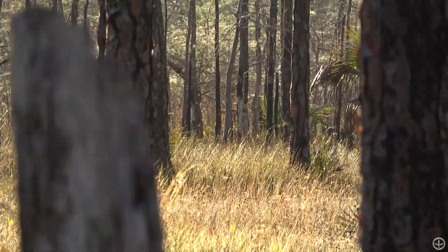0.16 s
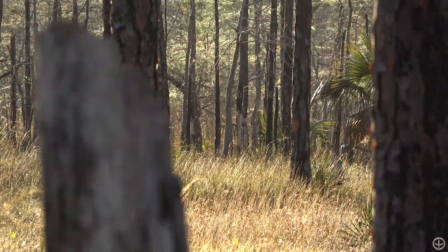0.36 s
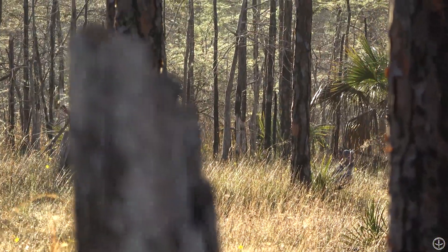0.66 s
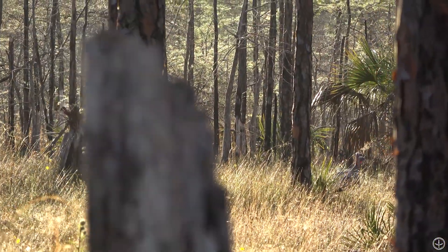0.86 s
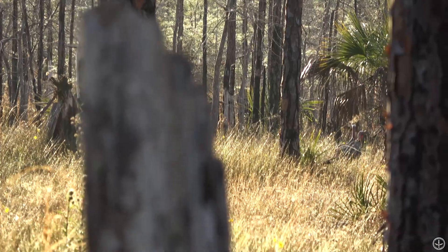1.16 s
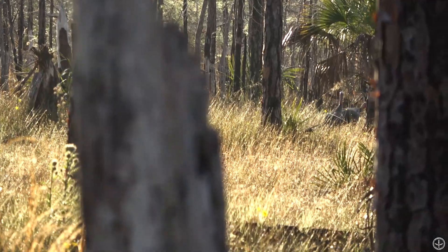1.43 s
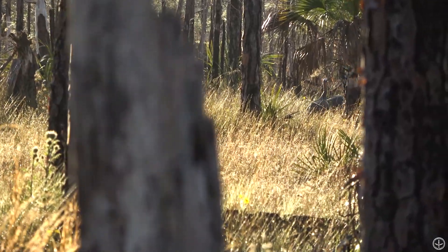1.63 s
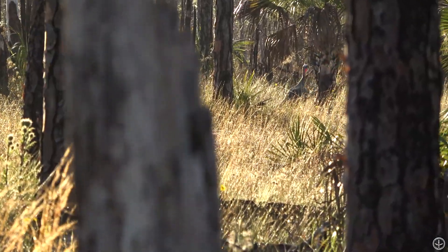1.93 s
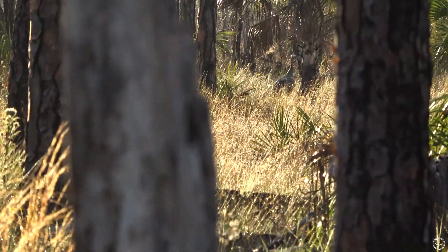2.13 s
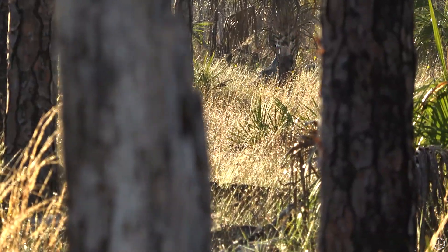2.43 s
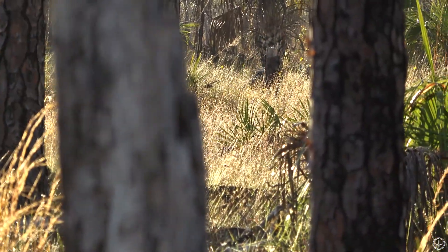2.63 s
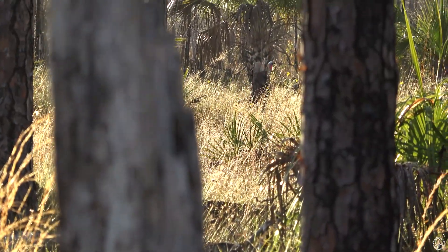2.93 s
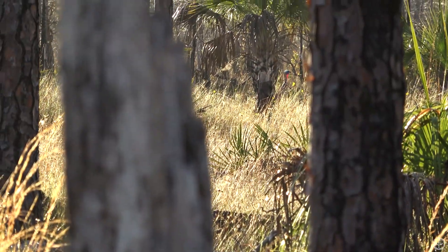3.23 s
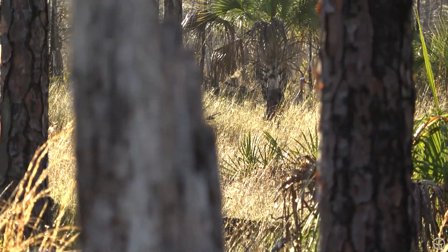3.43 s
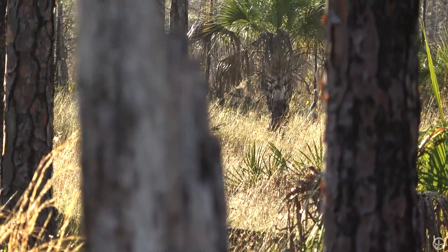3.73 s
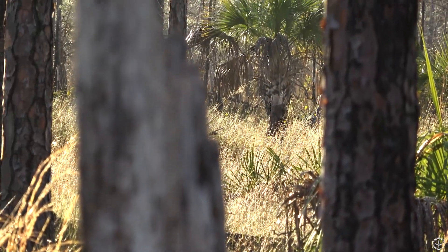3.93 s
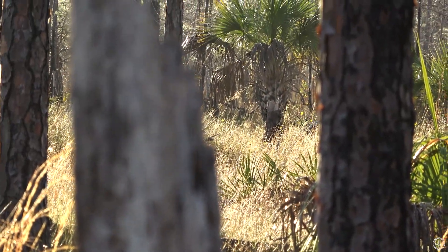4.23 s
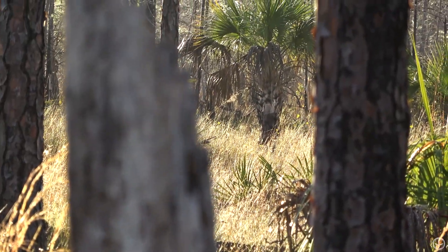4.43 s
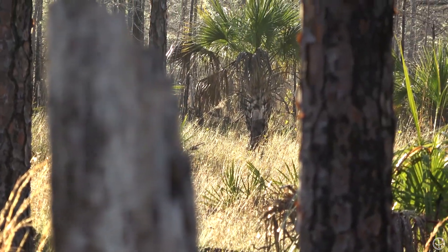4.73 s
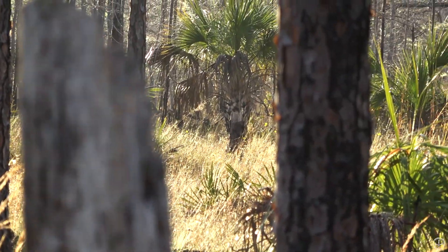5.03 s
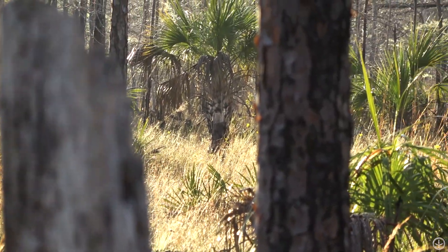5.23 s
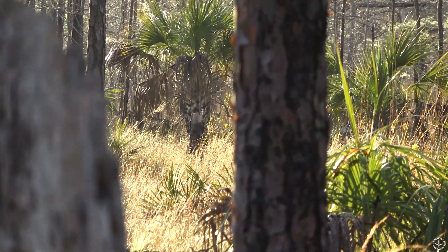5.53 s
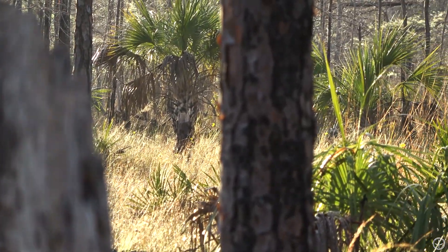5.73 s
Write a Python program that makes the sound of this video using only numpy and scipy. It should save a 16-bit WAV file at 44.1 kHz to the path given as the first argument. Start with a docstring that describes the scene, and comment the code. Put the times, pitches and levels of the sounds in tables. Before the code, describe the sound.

Quiet open pine woodland with soft air and faint high insects. The microphone's mount sways with deep rumble, drone and muffled thuds; a few dry twig ticks sound close by. A faint buzzy trill comes early, then four short arched whistles, growing louder. Just before three seconds a woodpecker drums a fast, hollow roll for under a second, echoing off the trunks. Faint falling bird notes follow, then hoarse distant calls at the end.

```python
"""Open pine woodland. A bird gives one fast, hollow rattle, most likely a woodpecker drumming on a dead trunk:
each blow rings decaying modes. A songbird whistles four arched notes, nearly pure swept tones.
Fainter birds slur, chip, trill and call hoarsely as gliding tones, noise bursts and a filtered harmonic stack.
Insects and air are shaped noise, twigs tick as resonant bursts, and the moving mount rumbles, drones and thuds.
The trunks scatter the drumming and most of the bird voices back as a decaying train of random echoes."""
import sys
import numpy as np
from scipy import signal
from scipy.fft import rfft, irfft, next_fast_len
from scipy.io import wavfile
from scipy.ndimage import uniform_filter1d

SR = 44100
rng = np.random.default_rng(int(sys.argv[2]) if len(sys.argv) > 2 else 0)


def generate_wav(sig):
    """Save sig (samples, or channels by samples) to the path in sys.argv[1] as 16-bit PCM at SR."""
    pcm = np.round(np.clip(np.atleast_2d(sig).T, -1, 1) * 32767).astype(np.int16)
    wavfile.write(sys.argv[1], SR, pcm)


N = 258867
TIME = np.arange(N) / SR  # seconds


def undb(db):
    """Logarithmic level: decibels to amplitude gain."""
    return 10 ** (np.asarray(db) / 20)


def unit(x):
    """Normalisation: scale to rms 1."""
    return x / np.sqrt(np.mean(x ** 2))


def add(track, start_s, sound):
    """Superposition: mix a sound into a track, cut off at the track's end."""
    i = max(int(start_s * SR), 0)
    track[i:i + len(sound)] += sound[:max(N - i, 0)]


def resonate(x, hz, width_hz):
    """Simple resonance: a two-pole peak with gain 1 at its centre."""
    centre_hz = min(hz, .45 * SR)
    return signal.lfilter(*signal.iirpeak(centre_hz, hz / width_hz, fs=SR), x)


def band(hz, width_hz):
    """Cascaded resonance: noise through two equal peaks has steep sides; rms 1."""
    noise = rng.standard_normal(N + SR)
    once = resonate(noise, hz, width_hz)
    return unit(resonate(once, hz, width_hz)[SR:])  # drop the first second, while the filters settle


def coloured(points):
    """Spectral shaping: noise weighted by (Hz, dB) points joined on a log-frequency axis; rms 1."""
    hz, db = np.transpose(points)
    size = next_fast_len(N)
    f = np.maximum(np.fft.rfftfreq(size, 1 / SR), 1)
    gain = undb(np.interp(np.log(f), np.log(hz), db))
    spectrum = rfft(rng.standard_normal(size)) * gain
    return unit(irfft(spectrum, size)[:N])


def walk(rate):
    """Random modulation: steps drawn at this rate (Hz), smoothed twice; rms 1."""
    k = int(SR / rate)
    steps = np.repeat(rng.standard_normal(N // k + 1), k)
    smooth = uniform_filter1d(uniform_filter1d(steps, k), k)
    return unit(smooth[:N])


def even(x, span_s):
    """Envelope levelling: divide a vibration by its running rms over span_s."""
    return x / np.sqrt(uniform_filter1d(x ** 2, int(span_s * SR)) + 1e-9)


def glide(length_s, start_hz, middle_hz, end_hz):
    """Frequency modulation: one soft-edged sine whose pitch follows a parabola through three points."""
    u = np.linspace(0, 1, int(length_s * SR))
    hz = np.polyval(np.polyfit([0, .5, 1], [start_hz, middle_hz, end_hz], 2), u)
    swell = np.abs(np.sin(np.pi * u)) ** 0.18
    return np.sin(2 * np.pi * np.cumsum(hz) / SR) * swell


def woods(x, t60_s=1.37, build_s=0.008, lumpiness=0.44, treble_hz=4000):
    """Multiple scattering: echoes of uneven strength from many trunks build up, die away and lose treble."""
    t = TIME[:SR * 3 // 2]
    echoes = rng.standard_normal(len(t)) * np.exp(lumpiness * rng.standard_normal(len(t)))
    echoes *= undb(-60 * t / t60_s) * (1 - np.exp(-t / build_s))
    echoes /= np.sqrt(np.sum(echoes ** 2))
    dulled = signal.lfilter(*signal.butter(1, min(treble_hz, .45 * SR), fs=SR), echoes)
    return signal.fftconvolve(x, dulled)[:N]


# spectrum of the calm air in the pines: frequency_hz, relative_level_db (per Hz)
AIR_SPECTRUM = [(60, 3.5), (130, 2), (190, -2.5), (300, 0), (530, -3), (690, 1), (850, -2), (1300, -5),
                (1800, -11.5), (2700, -11.5), (3700, -18), (5800, -21), (7500, -24), (11000, -24.5),
                (15500, -29.5)]
AIR_DB, AIR_SWELL_DB = -64, .2  # mean level and spread
# faint, steady hum in the distance: centre_hz, resonance_width_hz, level_db
HUM_BANDS = [(284.3, 8.7, -83), (340.3, 9.5, -83.5), (636.4, 43, -75.5)]
# insect chorus: centre_hz, resonance_width_hz, mean_level_db
INSECT_BANDS = [(4596, 670, -82), (4670, 140, -84), (5050, 220, -86), (5530, 78, -87), (5945, 510, -86)]


def ambience(flicker_db=0.66):
    """Stationary noise: air that barely swells, a faint hum and insect bands with a slight shimmer."""
    out = coloured(AIR_SPECTRUM) * undb(AIR_DB + AIR_SWELL_DB * walk(3.27))
    for hz, width_hz, db in HUM_BANDS:
        out += band(hz, width_hz) * undb(db)
    for hz, width_hz, db in INSECT_BANDS:
        out += band(hz, width_hz) * undb(db + flicker_db * walk(40))
    return out


# spectrum of the mount's slow sway: frequency_hz, relative_level_db (per Hz)
SWAY_SPECTRUM = [(5, -27.5), (10, -14), (13.3, 1.5), (17, -13.5), (24, -27), (40, -42), (60, -53.5),
                 (110, -75), (400, -130)]
# course of the sway: time_s, level_db (before the trim sway_db)
SWAY_COURSE = [(0.0, -45.5), (0.22, -33.5), (0.44, -45), (0.6, -34.5), (0.74, -44), (1.13, -35),
               (1.35, -41), (1.53, -33.5), (2.4, -49), (2.86, -37), (3.1, -46), (4.1, -40), (4.35, -36),
               (4.8, -43), (5.25, -36.5), (5.85, -45)]
# course of the mount's drone: time_s, level_db
DRONE_COURSE = [(0.0, -66), (0.18, -66), (0.45, -54), (0.7, -61), (0.92, -53.5), (1.33, -68), (1.62, -56),
                (1.9, -63), (2.05, -56), (2.4, -54.5), (2.58, -67), (2.98, -64.5), (3.17, -49.5),
                (3.42, -65.0), (3.82, -63), (4.2, -57), (4.95, -63), (5.8, -54)]
DRONE_HZ, DRONE_WIDTH_HZ = 80.7, 13.2  # width of each of the two cascaded resonances
# spectrum of the steady low rumble: frequency_hz, relative_level_db (per Hz)
RUMBLE_SPECTRUM = [(10, -11), (25, 1.5), (45, -4), (62, 0), (110, -22), (200, -58), (400, -100)]
RUMBLE_DB = -60.5
# knocks through the mount: start_s, pitch_hz, rise_s, envelope_peak_db
KNOCKS = [(0.876, 79.2, 0.021, -43.5), (1.14, 78.5, 0.032, -49), (1.39, 75, 0.02, -44),
          (2.341, 79, 0.011, -45), (3.14, 195, 0.0049, -57.5), (3.171, 77, 0.029, -46),
          (3.56, 80.8, 0.025, -47.5), (5.423, 272, 0.0063, -61.5)]


def mount(sway_db=0.5):
    """Structure-borne sound: the moving mount sways, rumbles and drones at its resonance; knocks thud softly."""
    sway_level_db = np.interp(TIME, *np.transpose(SWAY_COURSE)) + sway_db
    out = even(coloured(SWAY_SPECTRUM), 0.22) * undb(sway_level_db)
    drone_level_db = np.interp(TIME, *np.transpose(DRONE_COURSE))
    out += even(band(DRONE_HZ, DRONE_WIDTH_HZ), 0.14) * undb(drone_level_db)
    out += coloured(RUMBLE_SPECTRUM) * undb(RUMBLE_DB)
    t = TIME[:SR // 4]
    for start_s, hz, rise_s, db in KNOCKS:
        swell = t / rise_s * np.exp(1 - t / rise_s)  # reaches 1 at rise_s
        add(out, start_s, undb(db) * swell * np.sin(2 * np.pi * hz * t))
    return out


# twig ticks: start_s, centre_hz, resonance_width_hz, burst_t60_s (before the resonances), peak_db
TWIG_TICKS = [(.262, 1220, 400, 0.0177, -49.5), (0.262, 4200, 1300, 0.011, -56),
              (.433, 1800, 1000, 0.016, -55), (2.058, 3720, 6750, 0.01, -48.5),
              (2.057, 12500, 6000, 0.0067, -67), (2.176, 716, 400, 0.014, -58)]


def twigs():
    """Impulsive excitation: each dry snap is a dying noise burst through two equal resonances."""
    out, t = np.zeros(N), TIME[:SR // 20]
    for start_s, hz, width_hz, t60_s, db in TWIG_TICKS:
        burst = rng.standard_normal(len(t)) * undb(-60 * t / t60_s)
        snap = resonate(resonate(burst, hz, width_hz), hz, width_hz)
        add(out, start_s, undb(db) * snap / np.abs(snap).max())
    return out


TRILL_START_S, TRILL_END_S = .797, 1.205
TRILL_RATE_HZ, TRILL_DB = 79, -73  # notes per second, mean level


def trill(waver_db=2.0, waver=.012):
    """Rapid repetition: tiny, uneven falling notes, each half a period long, merge into a thin buzz."""
    out = np.zeros(N)
    for start_s in np.arange(TRILL_START_S, TRILL_END_S, 1 / TRILL_RATE_HZ):
        strength, pitch = rng.standard_normal(2)
        fall_hz = np.array([5650, 5550, 5400]) * (1 + waver * pitch)
        note = glide(.5 / TRILL_RATE_HZ, *fall_hz)
        add(out, start_s, undb(TRILL_DB + waver_db * strength) * note)
    return out


# hoarse far calls: start_s, length_s, mean_pitch_hz, mouth_resonance_hz, rms_level_db (at the source)
HOARSE_CALLS = [(5.536, 0.089, 611, 1210, -72), (5.79, 0.183, 656, 1470, -65.5)]


def caws(rough=0.044, rasp=0.25, mouth_width_hz=450, bend=0.102):
    """Source and filter: harmonics 2 to 4, arched and unsteady, pass through one mouth resonance."""
    out = np.zeros(N)
    for start_s, length_s, pitch_hz, mouth_hz, db in HOARSE_CALLS:
        arch = np.sin(np.linspace(0, np.pi, int(length_s * SR)))
        hz = pitch_hz * (1 + bend * (arch - arch.mean()) + rough * walk(700)[:len(arch)])
        phase = 2 * np.pi * np.cumsum(hz) / SR
        voice = sum(np.sin(k * phase) for k in range(2, 5))
        voice = voice * (1 + rasp * walk(230)[:len(arch)])
        call = resonate(voice, mouth_hz, mouth_width_hz) * np.sqrt(np.abs(arch))
        add(out, start_s, undb(db) * unit(call))
    return out


# falling slurs: start_s, length_s, start_pitch_hz, mean_level_db (at the source)
FALLING_SLURS = [(3.75, 0.079, 3860, -76), (3.937, 0.09, 2884, -70.5), (4.276, 0.093, 2910, -71.5),
                 (4.353, 0.12, 4070, -77.5), (4.6, 0.075, 2470, -73.5), (4.93, 0.049, 2800, -78),
                 (4.985, 0.11, 3880, -79.5), (5.093, 0.2, 3100, -78), (5.645, 0.12, 3870, -78.5)]
# every slur sinks towards this share of its pitch below the start, levelling off with this time constant
SLUR_SINK, SLUR_SINK_S = .48, .18
# short rising notes: start_s, length_s, start_pitch_hz, end_pitch_hz, mean_level_db (at the source)
SHORT_NOTES = [(2.435, 0.065, 2134, 2920, -71.5), (3.717, .016, 3700, 4200, -72),
               (4.25, 0.046, 3470, 3526, -75.5), (5.403, 0.05, 2250, 2730, -72)]
# thin, high upward flicks: start_s, length_s, start_pitch_hz, end_pitch_hz, mean_level_db (at the source)
UPWARD_FLICKS = [(.094, .022, 6600, 8040, -77), (4.12, 0.025, 6370, 7500, -75.5),
                 (4.199, .03, 5970, 7250, -67), (4.601, .012, 7300, 7700, -78)]


def small_birds(flutter_db=3):
    """Amplitude fluctuation: thin gliding notes flutter in level on their way through the trees."""
    out = np.zeros(N)
    for start_s, length_s, hz, db in FALLING_SLURS:
        passed_s = np.array([0, .5, 1]) * length_s
        sunk = SLUR_SINK * (1 - np.exp(-passed_s / SLUR_SINK_S))
        add(out, start_s, undb(db) * glide(length_s, *(hz * (1 - sunk))))
    for start_s, length_s, start_hz, end_hz, db in SHORT_NOTES + UPWARD_FLICKS:
        add(out, start_s, undb(db) * glide(length_s, start_hz, (start_hz + end_hz) / 2, end_hz))
    return out * undb(flutter_db * walk(120))


# sharp, husky chip notes: start_s, level_db (rms of the noise before its swell)
CHIP_NOTES = [(1.165, -74), (2.728, -68.5), (4.657, -62)]
CHIP_HZ = 5280


def chips(length_s=0.018, width_hz=900):
    """Band-limited noise: a short swell of one noise band sounds husky."""
    out, swell = np.zeros(N), np.hanning(int(length_s * SR))
    for start_s, db in CHIP_NOTES:
        add(out, start_s, undb(db) * swell * band(CHIP_HZ, width_hz)[:len(swell)])
    return out


# arched whistles: top_s (time of the highest pitch), level_db (at the top)
ARCHED_WHISTLES = [(2.332, -69), (2.784, -60), (3.193, -56.5), (3.585, -54)]
# the pitch climbs to its top, drops quickly towards a knee and keeps sliding down (before the turn is rounded)
ARCH_START_HZ, ARCH_TOP_HZ, ARCH_KNEE_HZ, ARCH_SLIDE_HZ_PER_S = 2156, 2983, 2164, 4200
ARCH_RISE_S, ARCH_DROP_S, ARCH_FALL_S = .032, .012, 0.13  # the drop is a time constant
ARCH_ATTACK_S, ARCH_RELEASE_S, ARCH_FADE_DB_PER_S = 0.013, 0.042, 50


def whistler(waver=0.01, overtone_db=-30, turn_s=0.0048):
    """Frequency sweep: a nearly pure tone with a faint octave rises, turns sharply and sinks away."""
    out = np.zeros(N)
    t = np.arange(-ARCH_RISE_S, ARCH_FALL_S, 1 / SR)  # zero at the top
    fallen_s = np.maximum(t, 0)
    rising_hz = ARCH_TOP_HZ + (ARCH_TOP_HZ - ARCH_START_HZ) * t / ARCH_RISE_S
    drop_hz = (ARCH_TOP_HZ - ARCH_KNEE_HZ) * np.exp(-fallen_s / ARCH_DROP_S)
    falling_hz = ARCH_KNEE_HZ + drop_hz - ARCH_SLIDE_HZ_PER_S * fallen_s
    hz = uniform_filter1d(np.where(t < 0, rising_hz, falling_hz), int(turn_s * SR))
    attack = np.minimum((t - t[0]) / ARCH_ATTACK_S, 1)
    release = np.minimum((t[-1] - t) / ARCH_RELEASE_S, 1)
    swell = attack * release * undb(-ARCH_FADE_DB_PER_S * fallen_s)
    for top_s, level_db in ARCHED_WHISTLES:
        phase = 2 * np.pi * np.cumsum(hz * (1 + waver * walk(202.5)[:len(t)])) / SR
        tone = np.sin(phase) + undb(overtone_db) * np.sin(2 * phase)
        add(out, top_s - ARCH_RISE_S, tone * swell * undb(level_db))
    return out


# the beak starts quickly and settles to a slightly slower, steady beat
ROLL_S, BLOW_COUNT = 2.8898, 14
FIRST_GAP_S, STEADY_GAP_S, SETTLE_BLOWS = .0539, .0638, 2.6
# the blows grow from a soft first one to full force, then tire a little
BLOW_DB, SOFT_START_DB, GROW_BLOWS, TIRING_DB_PER_BLOW = -36.6, -11, 1.6, 0.28
# spectral tilt of a full-force blow (dB over two octaves) and its spread from blow to blow
BRIGHT_DB, BRIGHT_SPREAD_DB = 2.5, 0.5


def blows(spread_db=0.3, soft_dulling=0.27):
    """Impact dynamics: start, peak dB and brightness of each blow; softer blows are duller."""
    k = np.arange(BLOW_COUNT)
    gaps = STEADY_GAP_S + (FIRST_GAP_S - STEADY_GAP_S) * np.exp(-k / SETTLE_BLOWS)
    starts_s = ROLL_S + np.cumsum(gaps) - gaps
    force_db = SOFT_START_DB * np.exp(-k / GROW_BLOWS) - TIRING_DB_PER_BLOW * k
    strength, hardness = rng.standard_normal((BLOW_COUNT, 2)).T
    peaks_db = BLOW_DB + force_db + spread_db * strength
    bright_db = BRIGHT_DB + soft_dulling * force_db + BRIGHT_SPREAD_DB * hardness
    return zip(starts_s, peaks_db, bright_db)


# modes of the hollow trunk: mean_pitch_hz, t60_s, relative_level_db (before the tilt of each blow)
TRUNK_MODES = [(730, 0.0034, -14), (893, 0.016, 1.5), (1490, 0.015, -2.5), (1925, 0.016, -10.5),
               (2775, 0.014, -12), (3035, 0.024, -18), (4580, 0.0064, -20.5)]


def drumming(ground_s=0.001906, ground=0.38, scatter=0.021, contact_s=0.00045, lowest_hz=560):
    """Modal synthesis: each blow rings the trunk, harder contact favours high modes, and the ground reflects it."""
    out, t = np.zeros(N), TIME[:SR // 16]
    hz, t60_s, db = np.transpose(TRUNK_MODES)[:, :, None]
    chances = rng.standard_normal((BLOW_COUNT, len(TRUNK_MODES), 1))
    for (start_s, peak_db, bright_db), chance in zip(blows(), chances):
        tilt_db = bright_db * np.log2(hz / hz[1]) / 2  # pivots on the second mode
        ring = np.sin(2 * np.pi * hz * (1 + scatter * chance) * t) * undb(-60 * t / t60_s + db + tilt_db)
        knock = ring.sum(0) * (1 - np.exp(-t / contact_s))
        knock *= undb(peak_db) / np.abs(knock).max()
        add(out, start_s, knock)
        add(out, start_s + ground_s, -ground * knock)  # inverted reflection
    # a slim trunk radiates almost nothing below its first modes
    return signal.sosfilt(signal.butter(3, lowest_hz, "high", fs=SR, output="sos"), out)


def scene():
    """Superposition of direct and scattered sound: birds with woodland echo over the near sounds and the air."""
    drum, whistle, chip = drumming(), whistler(), chips()
    far = small_birds() + caws()
    # the undergrowth blurs the far birds
    far = far + undb(-4.5) * woods(far, t60_s=0.063, build_s=0.0016, treble_hz=9000)
    echo = woods(undb(-5.0) * drum + undb(-0.4) * whistle + undb(-2.5) * far)
    chip_echo = undb(0.5) * woods(chip, t60_s=1.0, build_s=0.0064, treble_hz=9000)
    birds = drum + whistle + far + chip + trill() + echo + chip_echo
    return (birds + twigs() + mount() + ambience())[None]


TOP_HZ = 15700


def record(dry):
    """Band limitation: the recorder cuts steeply above TOP_HZ."""
    return signal.sosfilt(signal.ellip(10, .1, 70, TOP_HZ, fs=SR, output="sos"), dry)


dry = scene()
out = record(dry)
generate_wav(out)
```